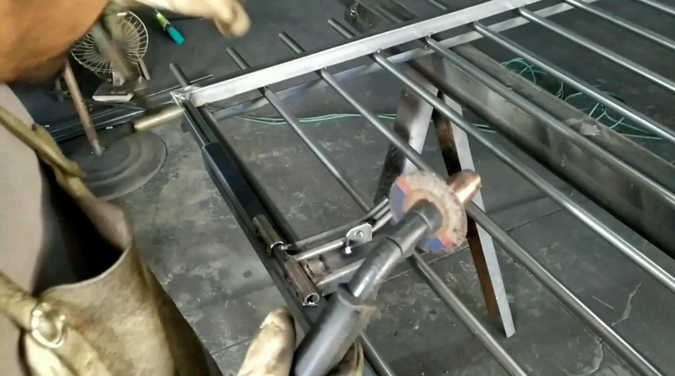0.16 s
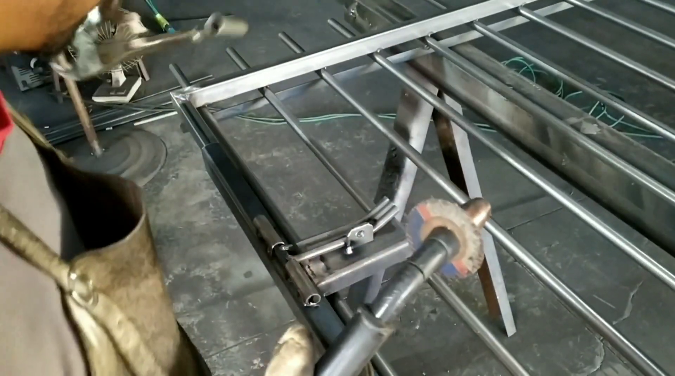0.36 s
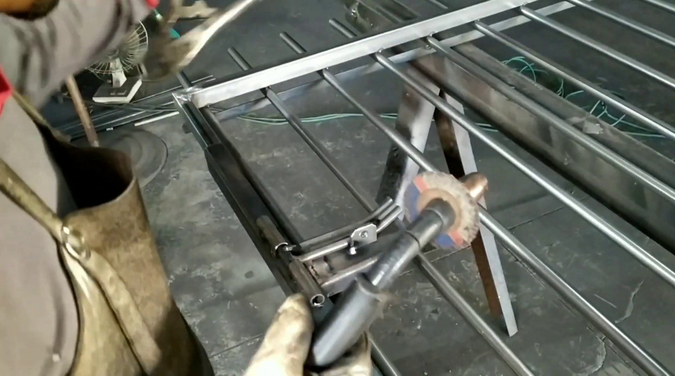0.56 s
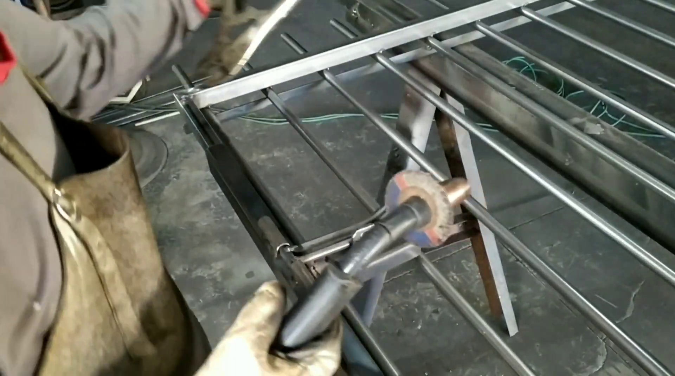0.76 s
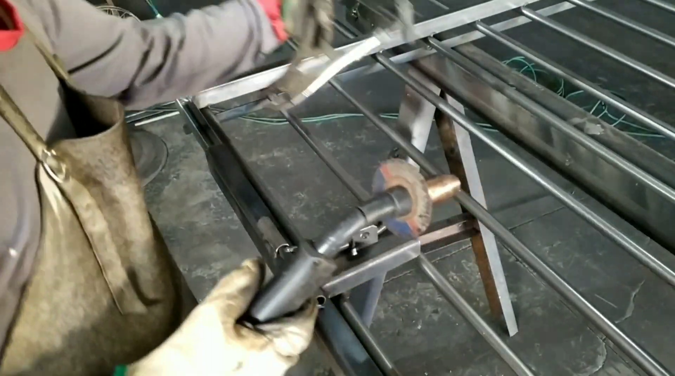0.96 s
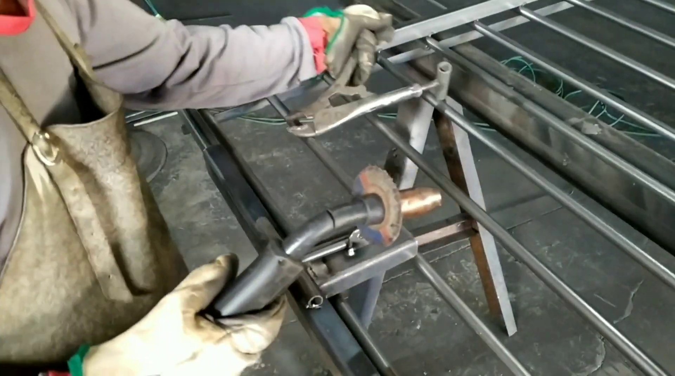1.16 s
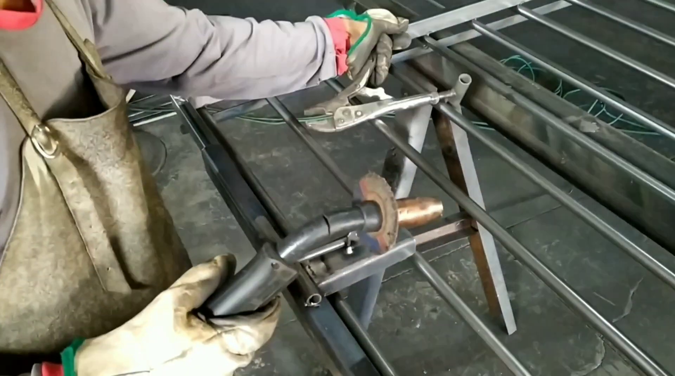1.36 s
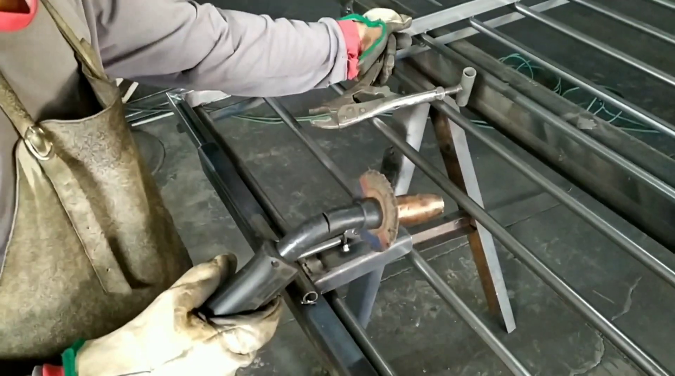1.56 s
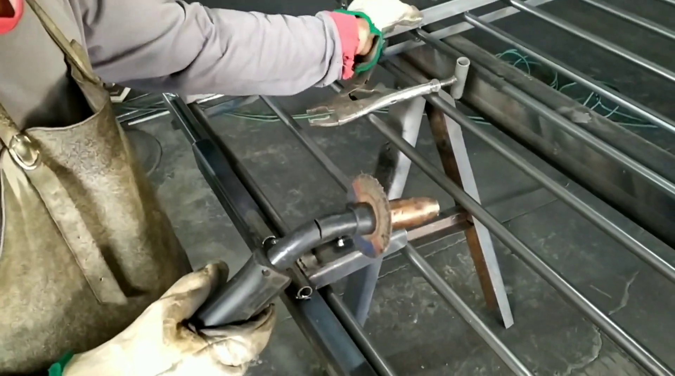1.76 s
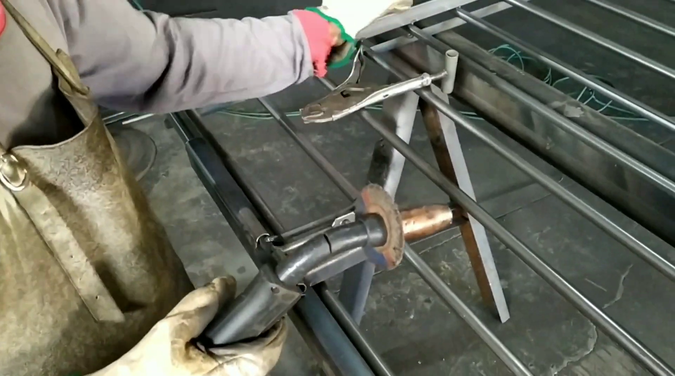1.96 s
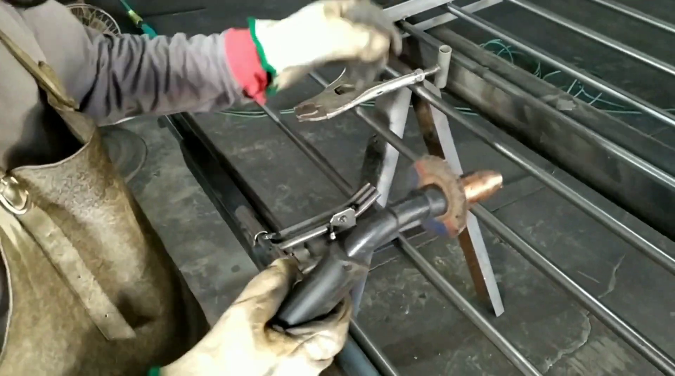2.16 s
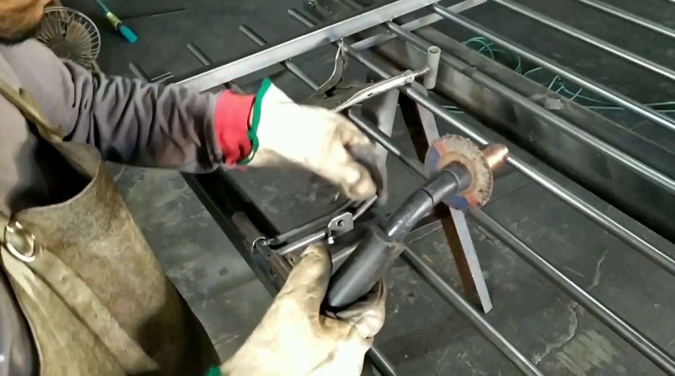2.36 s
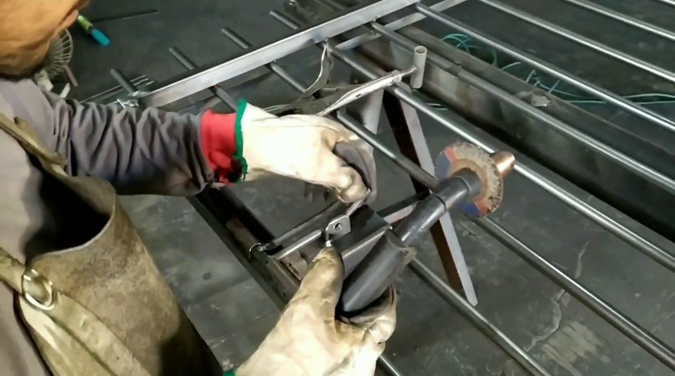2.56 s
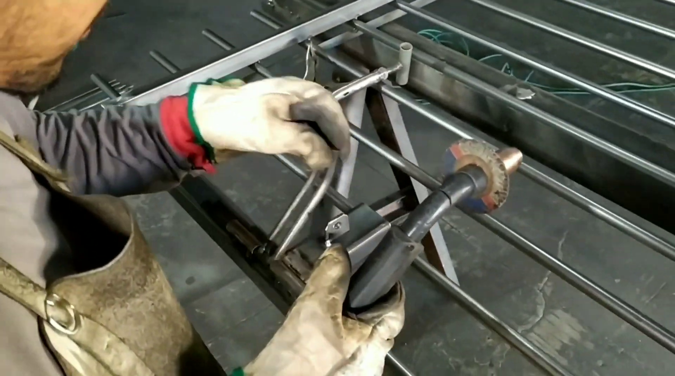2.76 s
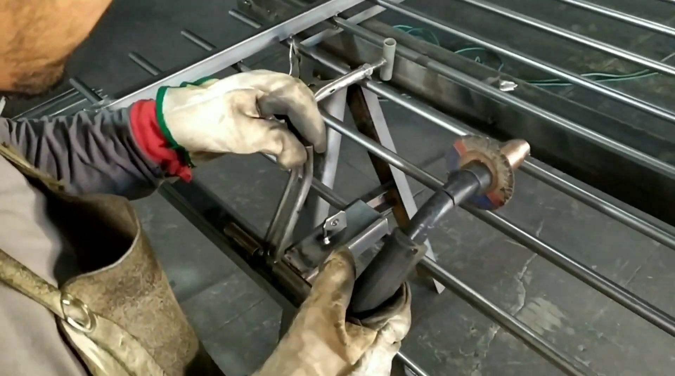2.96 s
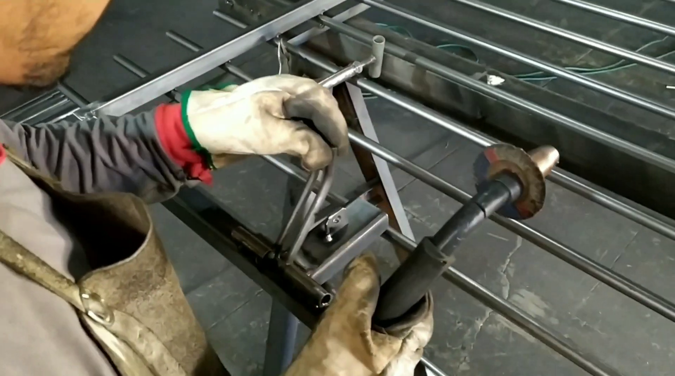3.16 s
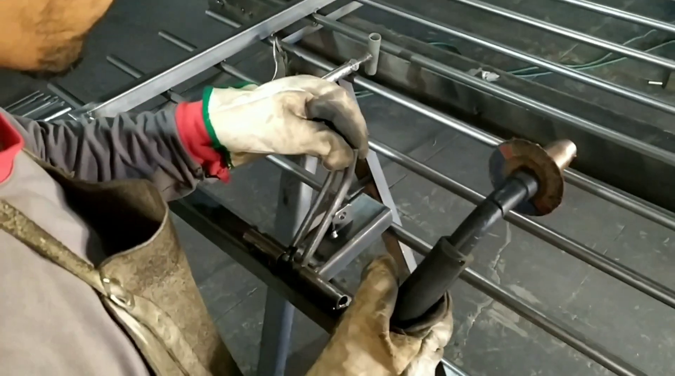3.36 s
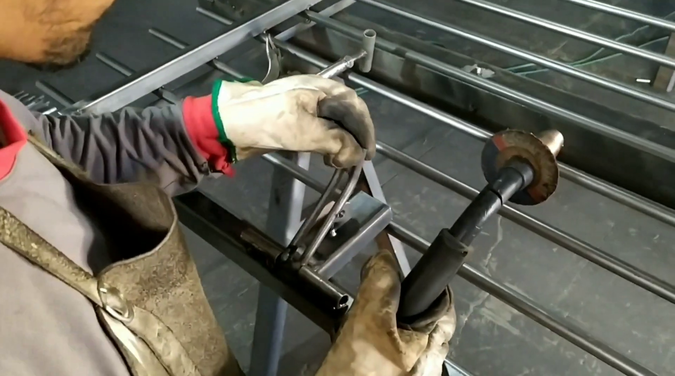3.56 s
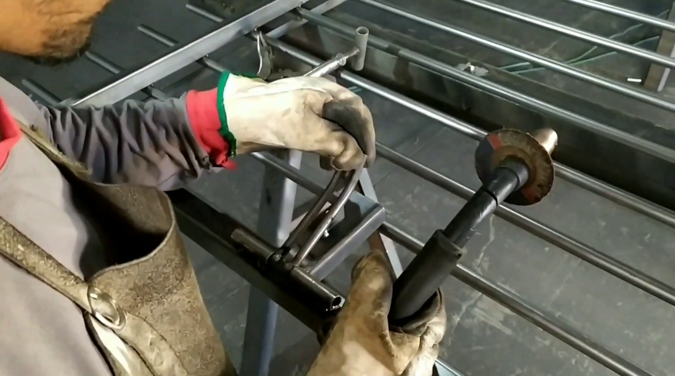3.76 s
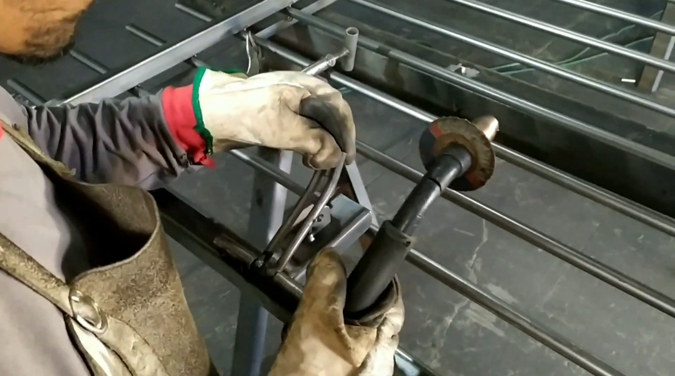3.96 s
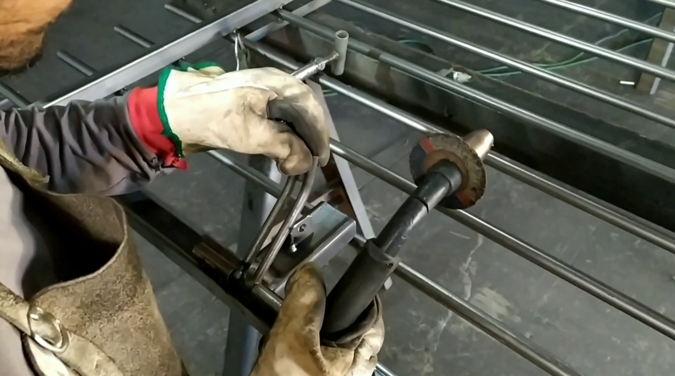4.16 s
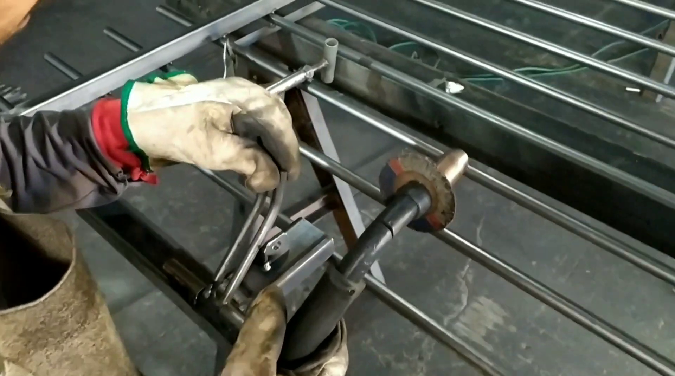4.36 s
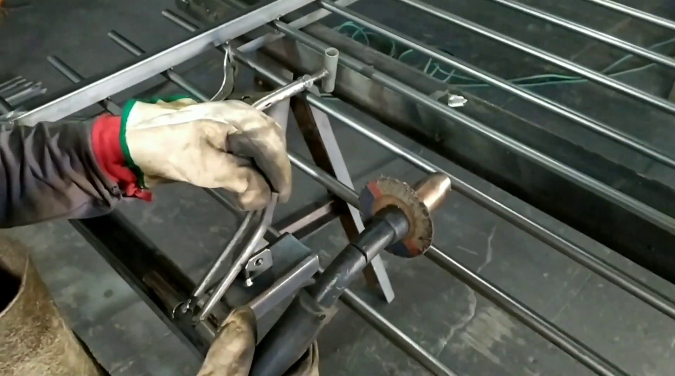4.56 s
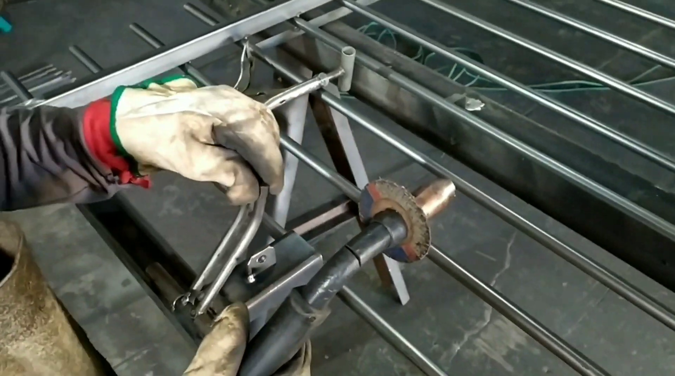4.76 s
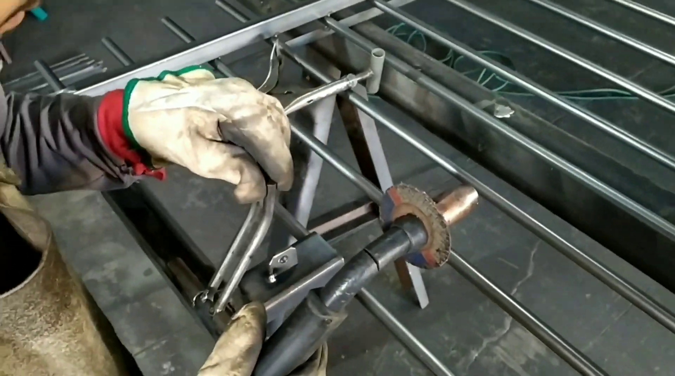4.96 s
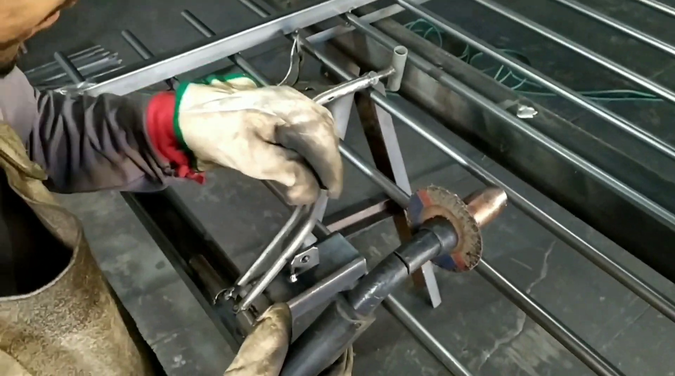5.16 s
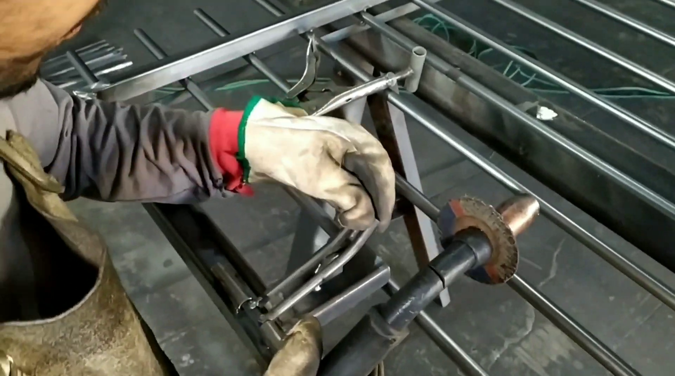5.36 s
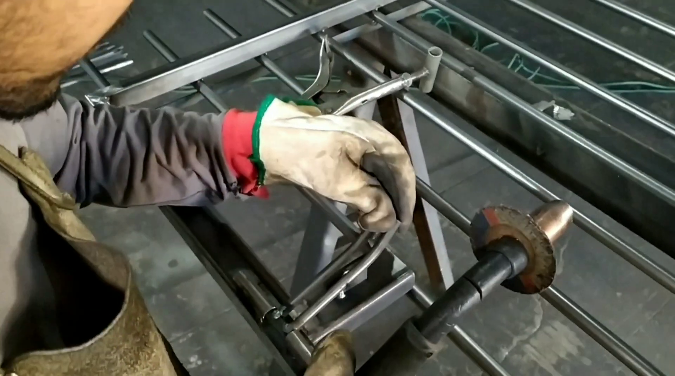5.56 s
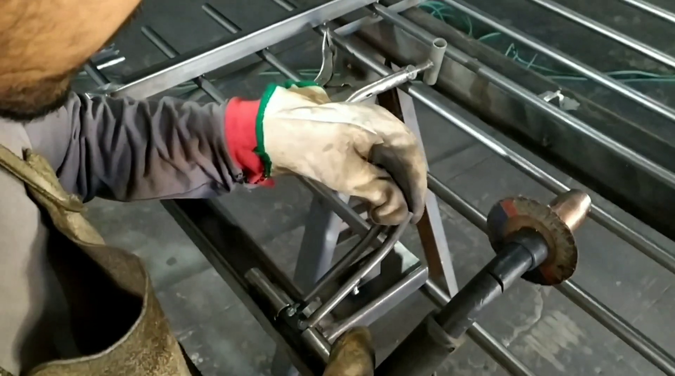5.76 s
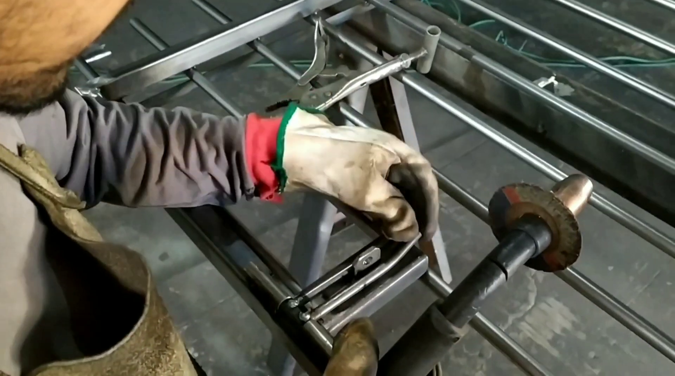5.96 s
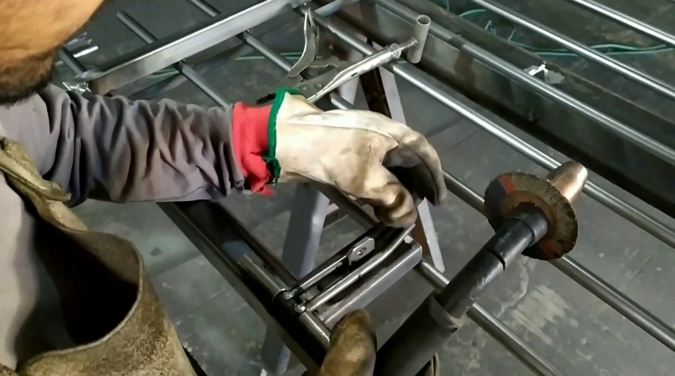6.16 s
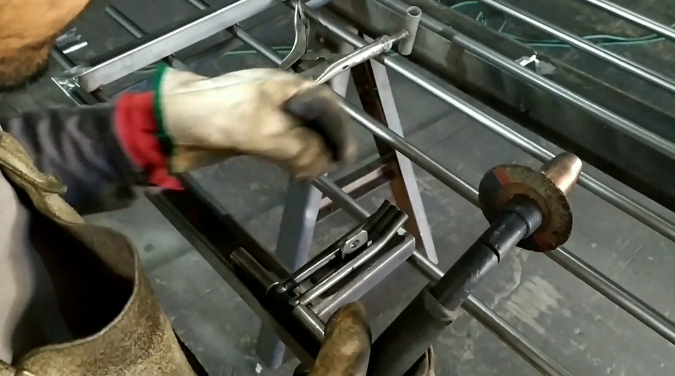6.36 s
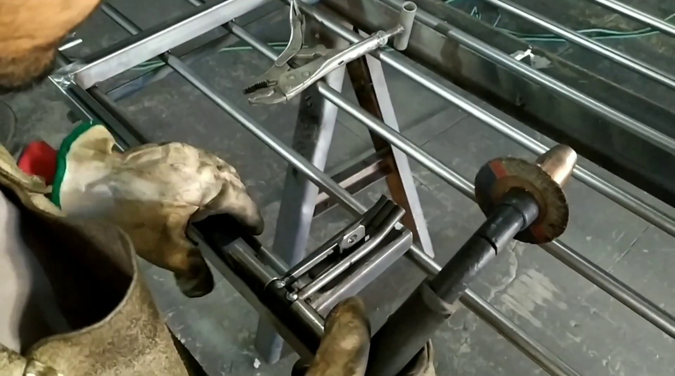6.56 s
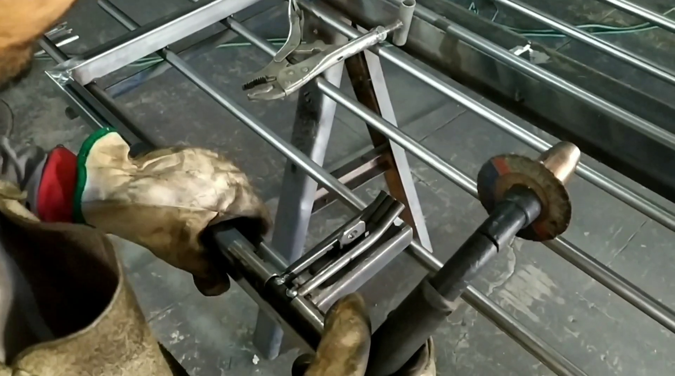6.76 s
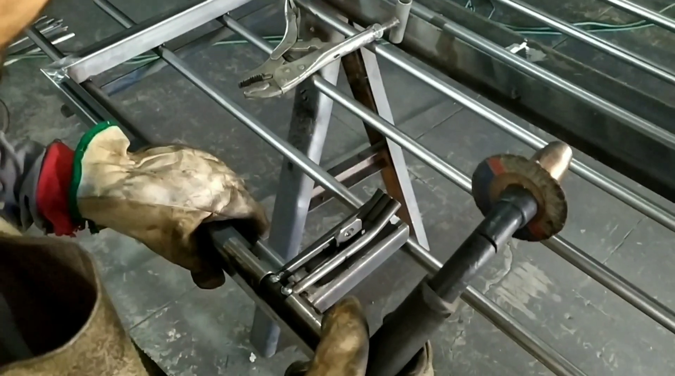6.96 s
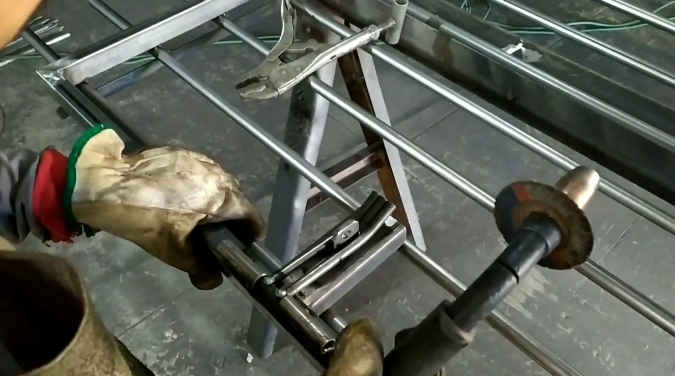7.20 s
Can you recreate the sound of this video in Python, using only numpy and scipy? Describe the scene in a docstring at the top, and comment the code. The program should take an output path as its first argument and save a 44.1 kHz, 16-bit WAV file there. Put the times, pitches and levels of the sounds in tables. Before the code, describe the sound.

A large, hard-walled metal workshop in close stereo. Faint rumble and airy wash from distant machines and fans lie underneath, with an engine idling low outside and a deep steady tone that swells and fades. Tiny clicks and faint glove rustle open the scene. At 1.2 s locking pliers snap onto a rod: the loudest blow, a dense metallic crack in quick succession with a smaller clack at 1.4 s and a broad echo. At about 2.0 and 2.1 s the rod knocks and rings brightly. From 1.5 to 5 s leather hisses over steel in short grainy strokes, while a bent tube gives a tap at 2.5 s and lighter ticks and scrapes. A firm, blurred trestle knock comes at 5.45 s. At 6.0 s the tube drops into its jig with a sharp, bright, ringing clang. Soft rubbing and small taps follow near 7 s as the engine fades and the low hum strengthens.

```python
"""A large workshop, heard by a microphone with two ports: gloved hands work on a welded steel frame.
Locking pliers snap onto a rod, the rod and a trestle knock, a bent tube is shifted, tapped and dropped into
its jig: each blow is a noise burst plus ringing modes, answered by a hall of decaying noise. Leather rubs on
steel as swelling hiss. An engine idles outside, a sum of sines; one low sine hums and swells; far machines
and fans are shaped noise."""
import sys
import numpy as np
from scipy import signal
from scipy.fft import rfft, irfft, next_fast_len
from scipy.io import wavfile
from scipy.ndimage import uniform_filter1d, map_coordinates

SR = 44100
rng = np.random.default_rng(int(sys.argv[2]) if len(sys.argv) > 2 else 0)


def int16_out(signal):
    """Quantize to a 16-bit WAV file."""
    q = np.round(np.clip(np.atleast_2d(signal).T, -1, 1) * 32767)
    wavfile.write(sys.argv[1], SR, q.astype(np.int16))


N = 318843
TIME = np.arange(N) / SR  # s
BLOW_TIME = np.arange(SR * 3 // 4) / SR  # s, the longest a blow itself lasts

# Spectra of noise: (frequency [Hz], relative density [dB per Hz])
RUMBLE_SPECTRUM = [(15, -39), (25, -13.5), (54, -7), (92, -2), (156, -1), (172, -6), (194, -7.5),
                   (260, -21), (340, -56), (570, -120)]
WASH_SPECTRUM = [(120, -52.5), (200, -4.5), (334, -7), (735, -8), (836, -7), (1400, -14), (2250, -17),
                 (3130, -26.5), (7680, -28.5), (11700, -35), (12600, -39), (14600, -40.5), (16000, -58)]
LEATHER_SPECTRUM = [(590, -40.5), (1000, -16), (1220, -21.5), (1670, 10), (1940, 5), (4020, -1.5),
                    (7190, -3.5), (12000, -10), (16000, -18)]
# Courses of the rumble, the wash and the hum: (time [s], level [dB])
RUMBLE_LEVEL = [(0, -49), (1.6, -52.5), (3.2, -54), (4.1, -51.5), (5.7, -53.5), (6.5, -57.5), (7.23, -56)]
WASH_LEVEL = [(0, -54), (1.2, -52.5), (2.5, -49.5), (4, -54), (5.5, -53.5), (7.23, -58)]
HUM_LEVEL = [(0, -53), (1.0, -57), (1.8, -63), (2.5, -52), (3.0, -51), (3.6, -56), (4.1, -48), (4.4, -54.5),
             (5.2, -51), (5.55, -61), (5.86, -44), (6.7, -43), (7.23, -38.5)]
# Course of the engine outside: (time [s], cycle rate [Hz], level [dB])
ENGINE_COURSE = [(0, 23.9, -58), (1, 23.47, -54.5), (2, 23.48, -51.5), (3.3, 23.49, -52.5),
                 (3.7, 22.8, -67.5), (4.2, 21.61, -62), (5, 21.33, -58), (5.8, 21.84, -59),
                 (6.3, 22.14, -63.5), (7.23, 23.2, -82.5)]
# Strength of each engine order: (multiple of the cycle rate [1], relative level [dB])
ENGINE_ORDERS = [(2, 1.5), (3, -3.5), (4, -8), (5, -16.5), (6, -8), (7, -7)]
# Glove strokes: (loudest moment [s], level [dB], swell [s], fade [s], treble up and bass down [dB])
GLOVE_STROKES = [(.02, -57, 0.089, 0.55, 3.5), (.335, -62, 0.15, 0.056, 6), (.55, -67, .1, .04, 0),
                 (.78, -64.5, .08, .6, -2), (1.55, -47.5, .1, 0.58, 7), (1.872, -44, 0.069, .1, 0),
                 (2.31, -44, 0.042, 0.16, 0), (2.539, -43.5, 0.027, 0.087, 2),
                 (2.76, -44.5, 0.043, 0.21, 2.5), (3.14, -43.5, 0.24, 0.19, 5), (3.4, -49.5, 0.25, 0.37, 4),
                 (3.57, -50.5, 0.033, .1, 0), (3.918, -55.5, 0.14, 0.29, 5), (4.05, -55, 0.2, 0.093, 4),
                 (4.28, -53, 0.085, 0.099, 4), (4.49, -49, 0.028, 0.079, 5.5), (4.66, -51, .02, .2, 3.5),
                 (4.83, -58, 0.055, .2, 1), (4.9, -44.5, 0.022, 0.039, 1.5), (4.99, -53.5, .2, 0.14, 3),
                 (5.25, -58, .07, .5, 4.5), (5.6, -59, .1, .5, 3), (5.91, -51, 0.034, 0.064, 6.5),
                 (5.992, -50, 0.045, .03, 3), (6.752, -55, 0.1, 0.2, 5), (6.918, -45.5, 0.027, 0.099, 1.5),
                 (7.11, -54.5, 0.17, 0.17, 6)]
# Blows on each piece: (time [s], level [dB], low, high and top band offsets [dB],
# decay time before the band factor [s], left over right [dB])
PLIERS_BLOWS = [(.3404, -57, -16.5, -17, 8, 0.1, -3), (.375, -60, 2.5, 2, -21, .16, -4),
                (.5494, -68.5, -19, -23.5, 13, .12, 3), (1.2315, -7.5, -34, -4.5, -5, 0.072, 0.5),
                (1.245, -9.5, -41, -12, 6.5, 0.041, 10.5), (1.266, -11, -25.5, -3, -24.5, 0.071, -4),
                (1.396, -20.5, -4, -6, -3, 0.069, 5)]
ROD_KNOCKS = [(1.9844, -34.5, -25, -2, 3.5, 0.22, 1.5), (1.9919, -23, -32, -8, -4.5, 0.2, .5),
              (2.1139, -37.5, -5, -11, -19, 0.24, 2), (2.1331, -27, -20, -10, -9.5, 0.21, 3.8)]
TUBE_TAPS = [(2.5329, -29, -14, -23, -25, 0.062, 3.5), (2.7489, -38.5, -2, -20, -4, 0.064, 2),
             (2.758, -41.5, -1, 4, 10, 0.08, 2), (2.8164, -46, 4, 11.5, 5, 0.11, 2),
             (2.9953, -44.5, 5, -13, 1.5, 0.069, 0), (3.323, -56, -9, 9, 5, .083, 5),
             (3.485, -55.5, -7, -8, 14, .086, 4), (3.5653, -40.5, 1, -12, -18, 0.037, -1),
             (4.4804, -53, -21, -9.5, 0, .1, -2), (4.4949, -45, -27, 0.5, 2, 0.071, 3),
             (4.6554, -46.5, -8, -12, -18, .062, -3), (4.7797, -40, -2.5, -5, -10, 0.075, 0.5),
             (4.8997, -45, -10, 1, -21, .14, 3), (5.248, -49.5, -1, -26.5, -21, .11, -5),
             (5.3153, -42, 2, -22, -26, .04, -1), (5.4009, -34.5, -9, -15, -9, 0.042, 1),
             (5.4187, -45, -0.5, 0.5, -9, .3, 2), (6.914, -40, 2, -17, -14, 0.083, 5.5),
             (7.0678, -48, -5.5, -16, -24, 0.12, 2)]
TRESTLE_KNOCK = [(5.4454, -23.5, -9.5, -8, -24, 0.14, -.5)]
JIG_DROP = [(6.0207, -12.5, -25.5, 2, -8, 0.067, -.28)]
# Modes of each struck piece: (frequency [Hz], relative level [dB], time to die by 60 dB [s])
PLIERS_MODES = [(433.4, -32.5, 0.88), (537.6, -26.5, 1), (568, -28, 0.53), (617, -20, 0.52), (685, -32, 1),
                (828, -19, 0.88), (1536, -15, 0.37), (1945, -5, 0.24), (2395, -10, 0.22),
                (2474, 0.5, 0.091), (3010, -6, 0.28), (3290, 2.5, 0.069), (3740, -12, 0.42), (3789, 1, .26),
                (5534, -7, .25), (2019, -5, .22), (2326, -5, .22), (3231, -7, .22), (3621, -9, .22),
                (4344, -8, 0.34), (4680, -13, 0.26), (4864, -6, 0.24), (6250, -4, 0.16), (7160, 0, 0.11),
                (7800, -15.5, 0.76), (8650, -22, .7), (10700, -28, .8), (11200, -20.5, .8),
                (11600, -16.5, 0.78), (12200, -21.5, 0.87), (12300, -35, .7), (11800, -14, .3)]
ROD_MODES = [(454.5, -14, 0.37), (619, -7.5, 0.32), (788, -3, 0.28), (860, -7, 0.34), (1560, -7, 0.42),
             (1700, -4.5, 0.8), (1993, -3.5, 0.35), (2200, -19, .2), (2024, -9, 0.4), (2270, 0, 0.24),
             (2565, -2.5, 0.38), (3580, -3, .15), (3670, 2, 0.16), (4790, -17, 0.26), (5610, 3.5, 0.18),
             (6200, 1, 0.19), (6840, 5, 0.14), (7340, 3.5, 0.18), (8350, 4.5, 0.14), (9460, 5, 0.1),
             (10900, -1.5, 0.22), (11220, -0.5, 0.3), (11650, -4, 0.15), (11900, 6, 0.17)]
TUBE_MODES = [(1044, -5.5, 0.11), (1465, 7, 0.027), (1790, -1.5, 0.2), (1936, 0, .12), (2020, -5.5, 0.24),
              (2254, -1.5, 0.11), (2760, -16.5, 0.23), (4650, -26, 0.13)]
TRESTLE_MODES = [(577, -6, 0.18), (816, 1, 0.14), (1101, -11, 0.46), (1540, 4.5, 0.14), (2140, -7, 0.35),
                 (2780, -7, 0.099), (3950, -2.5, 0.32), (4030, -6, 1), (4480, 1, 0.17), (5640, -21.5, 0.23),
                 (7020, 2, 0.16)]
JIG_MODES = [(773, -15.5, 0.77), (828, -19.5, .4), (1810, -27.5, 0.33), (1847, -8.5, 0.4), (2063, -7, .4),
             (2293, -2.5, 0.25), (2580, -16, 0.26), (2743, -5, 0.26), (3040, -5.5, 0.43), (3100, -24, .2),
             (3930, -27, .3), (4440, -4.5, .35), (4600, -14.5, 0.42), (5220, -2, 0.31), (6220, -3.5, 0.85),
             (6450, 2, 0.2), (6740, 4.5, 0.28), (7230, 2.5, 0.27), (7930, 4, 0.27), (8220, 3.5, 0.4),
             (9180, -6.5, 0.46), (9620, 4.5, 0.23), (9800, -1.5, 0.2), (10400, -4.5, 0.17),
             (10300, -7, .15), (10400, -14, 0.16), (12220, 1, 0.26), (13300, -6.5, 0.167)]
# Noise bands of the clatter: (centre [Hz], width [Hz], decay time factor [1])
CLATTER_BANDS = [(228.5, 2700, 1.2), (675, 350, 1.3), (2400, 2370, 1.43), (6400, 3600, 1.68),
                 (11900, 2400, 0.77)]
# Answer of the hall: (frequency [Hz], time to die by 60 dB [s])
HALL_DECAY = [(150, 0.86), (700, 2.03), (2500, 1.37), (6000, 1.215), (12000, 0.65)]
# Colour of the hall: (frequency [Hz], relative level [dB])
HALL_COLOUR = [(150, 21.5), (700, 2), (2500, 3.5), (6000, -3.5), (12000, -2.5)]
# Likeness of diffuse sound at the two ports: (frequency [Hz], correlation [1])
PORT_LIKENESS = [(60, 0.78), (180, 1), (550, 0.5), (1650, -0.034), (4970, 0.037), (15000, -0.022)]
# Response of the microphone: (frequency [Hz], gain [dB])
MIC_RESPONSE = [(30, -10.5), (45, 0), (14500, -0.5), (15700, -7), (16100, -32)]


def amp(db):
    """Gain for a level in dB."""
    return 10 ** (np.asarray(db) / 20)


def unit(x):
    """The signal scaled to rms 1."""
    return x / np.sqrt(np.mean(x ** 2) + 1e-20)


def along(points, hz):
    """Values between (Hz, value) points, on a log frequency axis."""
    point_hz, value = np.transpose(points)
    return np.interp(np.log(hz + 1), np.log(point_hz + 1), value)


def curves(rows):
    """One value per sample for each column after the time."""
    row_s, *columns = np.transpose(rows)
    return [np.interp(TIME, row_s, column) for column in columns]


def wobble(rate):
    """A smooth random curve with this many knots a second."""
    knots = rng.standard_normal(int(N * rate / SR) + 4)
    return map_coordinates(knots, [TIME * rate])


def filtered(x, response):
    """The signal shaped by a response given as a function of frequency."""
    length = x.shape[-1]
    padded = next_fast_len(length + 8192)
    spectrum = rfft(x, padded) * response(np.fft.rfftfreq(padded, 1 / SR))
    return irfft(spectrum, padded)[..., :length]


def diffuse(pair, colour):
    """Two unrelated signals coloured and mixed to the likeness of diffuse sound at the two ports."""
    def mid_side_gains(hz):
        angle = np.arccos(np.clip(along(PORT_LIKENESS, hz), -1, 1)) / 2
        return amp(along(colour, hz)) * np.array([np.cos(angle), np.sin(angle)])

    mid, side = filtered(pair, mid_side_gains)
    return np.array([mid + side, mid - side])


def rush(colour, patchy_db):
    """Diffuse stereo noise of rms 1, with random gain in patches of time and frequency."""
    noise = signal.stft(rng.standard_normal((2, N)), nperseg=512)[2]
    patches = uniform_filter1d(rng.standard_normal(noise.shape[1:]), 6, 0)
    patches = unit(uniform_filter1d(patches, 10, 1))
    pair = signal.istft(noise * amp(patchy_db * patches), nperseg=512)[1][:, :N]
    return unit(diffuse(pair, colour))


def shop():
    """Far machines and fans: diffuse noise in a low rumble and a wider wash, both unsteady in level."""
    rumble_gain = amp(curves(RUMBLE_LEVEL)[0] + 0.75 * wobble(12))
    wash_gain = amp(curves(WASH_LEVEL)[0] + 0.25 * wobble(6.5))
    rumble = rumble_gain * rush(RUMBLE_SPECTRUM, patchy_db=0.8)
    return rumble + wash_gain * rush(WASH_SPECTRUM, patchy_db=1.0)


def engine():
    """Idling outside: orders of the firing cycle, each wavering on its way through the walls."""
    cycle_hz, level_db = curves(ENGINE_COURSE)
    cycle_phase = 2 * np.pi * np.cumsum(cycle_hz) / SR
    orders = 0
    for multiple, order_db in ENGINE_ORDERS:
        gain = amp(order_db + 1.6 * wobble(1.7)) * np.sqrt(2)
        orders = orders + gain * np.sin(multiple * cycle_phase + .3 * wobble(1.3))
    return amp(level_db) * orders


def hum():
    """One low tone that swells and fades, wavering a little in level and phase."""
    hum_hz = 65.2
    gain = amp(curves(HUM_LEVEL)[0] + 0.8 * wobble(2.8)) * np.sqrt(2)
    return gain * np.sin(2 * np.pi * hum_hz * TIME + .3 * wobble(1.4))


def gloves():
    """Leather and cloth slide over steel: grainy hiss in swelling strokes, each with its own treble."""
    step = 32  # samples between envelope points
    range_db = 20  # how far a stroke lies below its peak after its swell or fade time
    roundness = 1.15  # 1 = pointed top, 2 = bell
    peak_s, level_db, swell_s, fade_s, tilt_db = np.transpose(GLOVE_STROKES)[:, :, None]
    late = TIME[::step] - peak_s
    distance = np.maximum(-late / swell_s, late / fade_s)
    power = amp(level_db - range_db * distance ** roundness) ** 2

    def envelope(side):
        strokes = np.sqrt(np.sum(power * amp(side * tilt_db) ** 2, axis=0))
        return np.repeat(strokes, step)[:N]

    hiss = rush(LEATHER_SPECTRUM, patchy_db=1.5)
    dull = filtered(hiss, lambda hz: 1 / (1 + (hz / 6000) ** 4))
    bright = hiss - dull
    grain = amp(1.2 * wobble(120) + wobble(30))
    return grain * (dull * envelope(-1) + bright * envelope(1))


def clatter(level_db, low_db, high_db, top_db, decay_s):
    """Three unrelated noise bursts from touching steel, each dying band by band."""
    centre, width, factor = np.transpose(CLATTER_BANDS)

    def split(hz):
        return np.array([np.sqrt(along(np.transpose([centre, row]), hz)) for row in np.eye(len(centre))])

    bands = filtered(rng.standard_normal((3, 1, len(BLOW_TIME))), split)
    band_db = np.array([[low_db - 15.5], [low_db], [0], [high_db], [top_db]])
    # narrow bands of white noise are weaker, so each is raised by its width
    gain = amp(level_db - 8 + band_db) * np.sqrt(SR / 2 / width[:, None])
    decay = amp(-60 * BLOW_TIME / (decay_s * factor[:, None]))
    return np.sum(bands * gain * decay, axis=1)


def ring(modes, level_db, blur):
    """The modes of the piece as dying sines, rung anew by every blow at each port."""
    mode_hz, mode_db, mode_t60 = np.transpose(modes)[:, :, None]
    level_luck, phase_luck = rng.standard_normal((2, 2, len(modes), 1))
    # touching parts blur each mode into a cluster: its phase wanders
    steps = rng.standard_normal((2, len(modes), len(BLOW_TIME)))
    drift = np.cumsum(steps, axis=2) * np.sqrt(2 * np.pi * blur * (mode_hz + 1200) / SR)
    gain = amp(level_db + mode_db + 2.0 * level_luck - 60 * BLOW_TIME / mode_t60)
    return np.sum(gain * np.sin(2 * np.pi * mode_hz * BLOW_TIME + 2.03 * phase_luck + drift), axis=1)


def hall(x):
    """The answer of the hall to one sound: diffuse noise in which each frequency dies at its own speed."""
    hz, t, noise = signal.stft(rng.standard_normal((2, SR + SR // 2)), SR, nperseg=256)
    decay = amp(-60 * t / along(HALL_DECAY, hz)[:, None])
    tail = diffuse(signal.istft(noise * decay, SR, nperseg=256)[1], HALL_COLOUR)
    tail *= 1 - np.exp(-np.arange(tail.shape[1]) / (0.0015 * SR))  # echoes build up
    return signal.fftconvolve(x[None], tail / np.linalg.norm(tail[0]), axes=1)


def struck(blows, modes, rise_ms, ring_db, wet_db, spread, blur):
    """Steel blows: clatter, the ring of the piece's modes, and the answer of the hall."""
    out = np.zeros((2, N + 3 * SR))
    rise = np.clip(BLOW_TIME / (rise_ms / 1000), 0, 1) ** 2
    end_fade = 1 - (BLOW_TIME / BLOW_TIME[-1]) ** 2
    for blow_s, level_db, low_db, high_db, top_db, decay_s, pan_db in blows:
        burst = clatter(level_db, low_db, high_db, top_db, decay_s)
        # long pieces sound from many points: part of the burst differs between the ports
        pair = np.sqrt(1 - spread) * burst[0] + np.sqrt(spread) * burst[1:]
        pair += ring(modes, level_db + ring_db, blur)
        pair *= rise * end_fade * amp([[pan_db / 2], [-pan_db / 2]])
        start = round(blow_s * SR - rise_ms * SR / 2000)  # the blow time is the middle of the rise
        out[:, start:start + len(BLOW_TIME)] += pair
        # the clatter spreads wider than the ring, so the hall hears more of it
        echo = hall(pair[0] * amp(-pan_db / 2) + amp(-2.5) * burst[0] * rise)
        out[:, start:start + echo.shape[1]] += amp(wet_db) * echo
    return out[:, :N]


def pliers():
    """Locking pliers snap onto the rod: a soft-edged rise and a strong answer of the hall."""
    return struck(PLIERS_BLOWS, PLIERS_MODES, rise_ms=6.3, ring_db=-11.5, wet_db=0.0, spread=0.93, blur=0.0033)


def rod():
    """The rod knocks back, ringing in many modes up into the treble."""
    return struck(ROD_KNOCKS, ROD_MODES, rise_ms=3.6, ring_db=-9.0, wet_db=-3.5, spread=0.9, blur=0.0094)


def tube():
    """The bent tube is shifted and tapped: sharp onsets and a few mid-frequency modes."""
    return struck(TUBE_TAPS, TUBE_MODES, rise_ms=1.1, ring_db=-8.5, wet_db=-4.5, spread=0.98, blur=0.0094)


def trestle():
    """One knock on the trestle, its rise slow and its modes strongly blurred."""
    return struck(TRESTLE_KNOCK, TRESTLE_MODES, rise_ms=8, ring_db=-10.5, wet_db=-9.5, spread=0.77, blur=0.025)


def jig():
    """The tube drops into its jig, ringing in a dense set of modes."""
    return struck(JIG_DROP, JIG_MODES, rise_ms=3, ring_db=-8.0, wet_db=-7.5, spread=0.9, blur=0.017)


def scene():
    """Everything at the two microphone ports."""
    low_tones = (engine() + hum()) * amp([[-.4], [.4]])  # a little louder on the right
    steel = pliers() + rod() + tube() + trestle() + jig()
    return shop() + low_tones + gloves() + steel


def record(dry):
    """The input rounds off high peaks; the microphone thins the deepest bass and top treble to a band limit."""
    top_hz = 17100
    soft = dry / (1 + np.abs(dry / .9) ** 4) ** (1 / 4)
    return filtered(soft, lambda hz: amp(along(MIC_RESPONSE, hz)) * (hz < top_hz))


dry = scene()
out = record(dry)
int16_out(out)
```